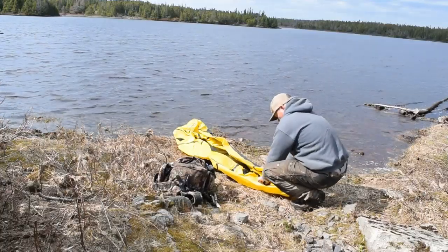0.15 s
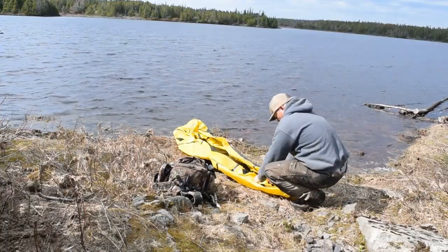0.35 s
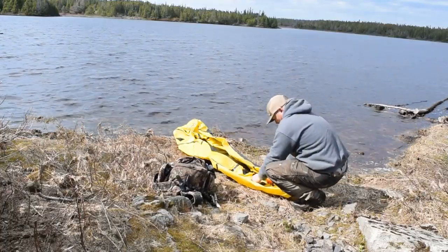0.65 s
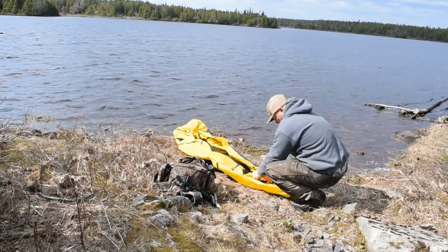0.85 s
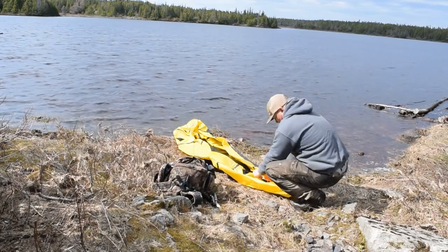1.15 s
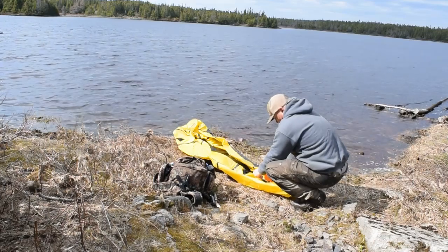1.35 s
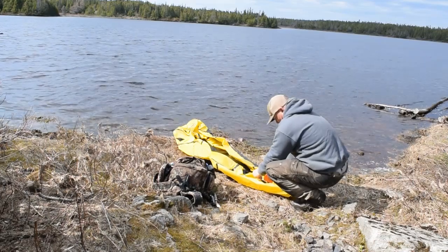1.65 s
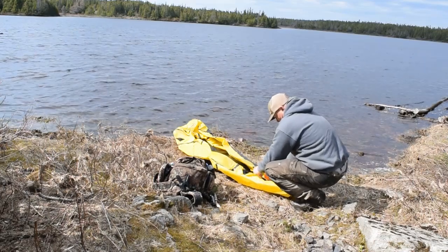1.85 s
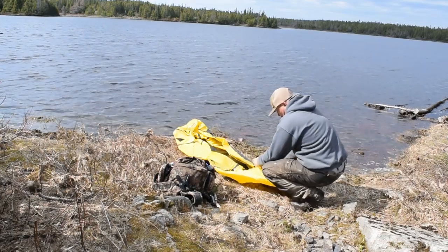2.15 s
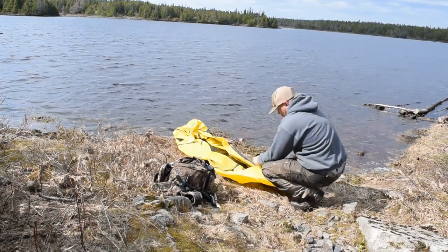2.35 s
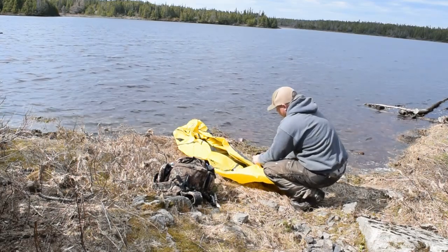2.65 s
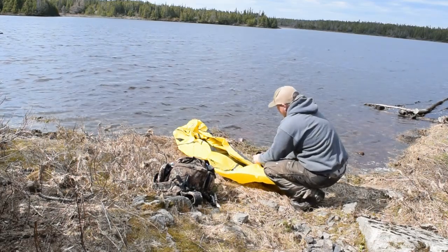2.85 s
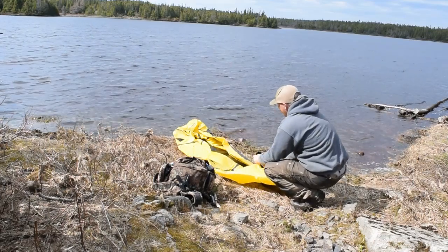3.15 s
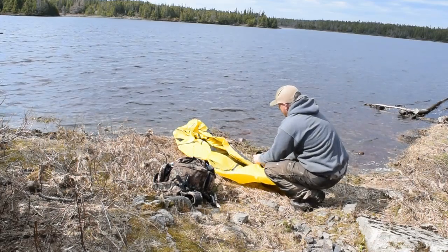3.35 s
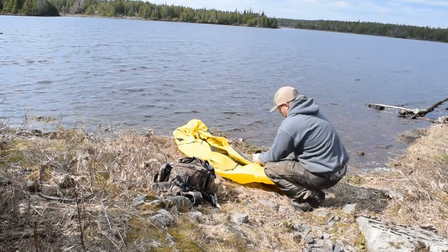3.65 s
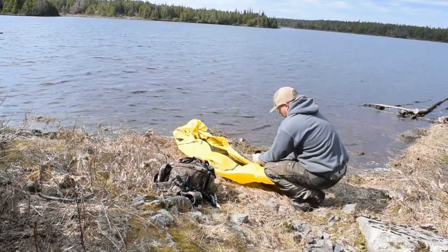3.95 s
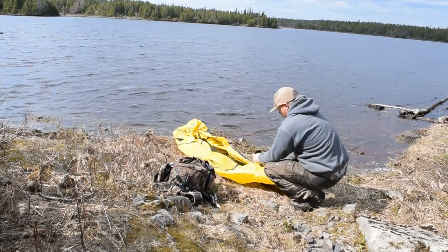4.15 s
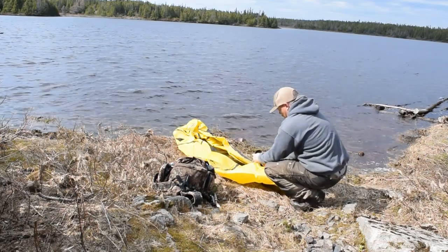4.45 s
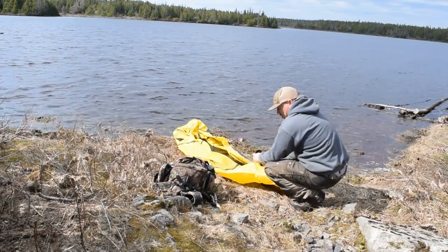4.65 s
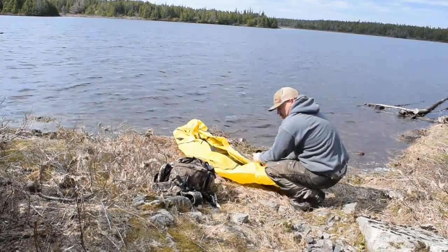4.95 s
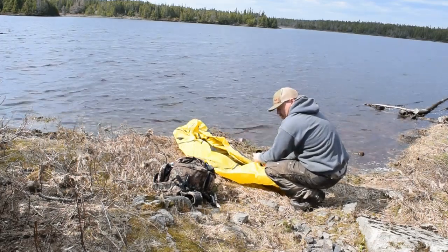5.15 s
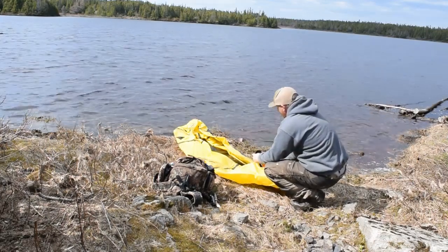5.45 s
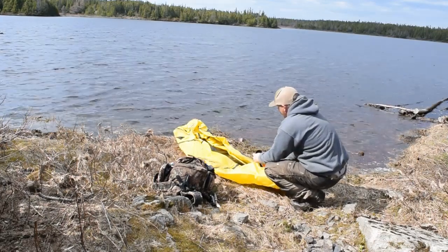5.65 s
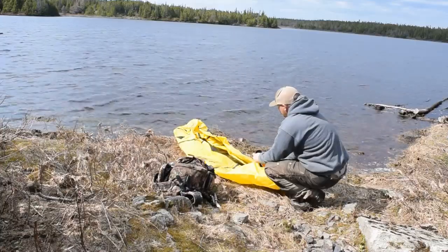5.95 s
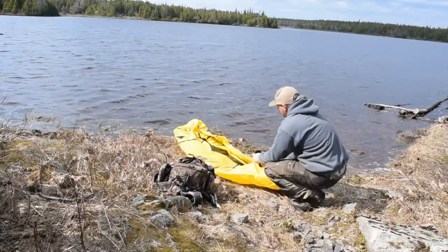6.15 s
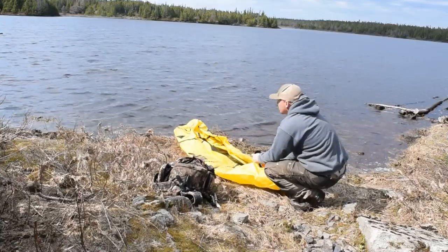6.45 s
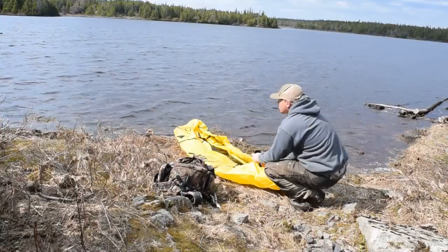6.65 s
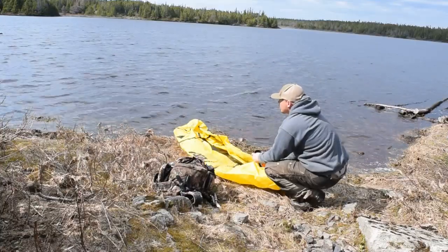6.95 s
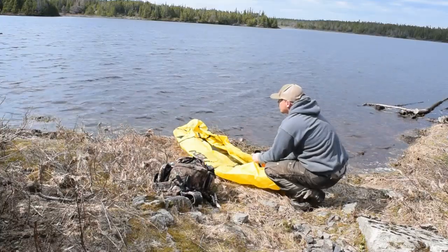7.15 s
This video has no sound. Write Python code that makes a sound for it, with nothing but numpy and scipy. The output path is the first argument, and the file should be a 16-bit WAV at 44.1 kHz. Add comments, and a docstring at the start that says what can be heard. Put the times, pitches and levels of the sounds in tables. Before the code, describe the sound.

Lakeside wind and crackling plastic fabric, a little electric air pump spinning up to a steady whine, then cut to a shrill fast-forward version.

```python
"""On a windy lake shore, wind rumbles on the microphone over a thin hiss while hands crinkle and drag a raft's fabric.
A small battery pump then starts: its motor spins up against air drag, its eight-bladed impeller sounds a tone
with overtones and shaft hum, and turbulent air rushes through the resonant casing. After a cut the playback runs
three times as fast: pump tones and noise spectra rise threefold, while sharp, mostly brighter cracks go on."""
import sys
import numpy as np
from scipy import signal
from scipy.fft import irfft, next_fast_len
from scipy.io import wavfile

SR = 44100
rng = np.random.default_rng(int(sys.argv[2]) if len(sys.argv) > 2 else 0)


def rack_gain(trim_db):
    """Turn a fader trim in dB into the linear factor to multiply a signal by."""
    fader = np.asarray(trim_db, float)
    return 10 ** (fader / 20)


def wav_out(sig):
    """Save sig, one row per channel (or a flat mono array), as 16-bit PCM at SR to the path in sys.argv[1]."""
    wavfile.write(sys.argv[1], SR, np.round(np.clip(np.atleast_2d(sig).T, -1, 1) * 32767).astype(np.int16))


N = 321930   # length [samples]
CUT_S, SPEED_UP = 4.877, 3   # time of the cut [s], playback speed after it


def rms_one(x):
    """Normalisation: scales a signal to unit root-mean-square."""
    return x / np.sqrt(np.mean(x ** 2) + 1e-20)


def in_time(rows):
    """Linear interpolation of each column of a time table, sample by sample."""
    seconds, *columns = np.transpose(rows)
    return [np.interp(np.arange(N) / SR, seconds, column) for column in columns]


def at_hz(points, hz):
    """Interpolation of a spectrum along a logarithmic frequency axis."""
    table_hz, table_db = np.array(points).T
    return np.interp(np.log(hz), np.log(table_hz), table_db)


def drift(rate, size):
    """Low-pass random process: white noise through a double real pole at rate [Hz], spread 1."""
    pole = np.exp(-80 * np.pi * rate / SR)   # computed at every 40th sample
    white = rng.standard_normal(size // 40 + 2002)
    slow = signal.lfilter([1], [1, -2 * pole, pole * pole], white)[2000:]
    return np.interp(np.arange(size) / 40, np.arange(len(slow)), rms_one(slow))


def played(colour_db, low_hz, high_hz, lumpy_db, lumps_per_s):
    """Time scaling of coloured noise: true speed, then faster after the cut, so spectrum and lumps both scale.

    Before the lumps, the band from low_hz to high_hz has rms 1 at its true frequencies."""
    cut = round(CUT_S * SR)
    band = np.arange(low_hz, min(high_hz, SR / 2), 2)
    power = 2 * np.sum(rack_gain(2 * colour_db(band)))
    parts = []
    for speed, length in [(1, cut), (SPEED_UP, N - cut)]:
        size = next_fast_len(length)
        true_hz = np.maximum(np.fft.rfftfreq(size, speed / SR), 1)
        real, imaginary = rng.standard_normal((2, len(true_hz)))
        spectrum = (real + 1j * imaginary) * rack_gain(colour_db(true_hz))
        noise = irfft(spectrum, size) * np.sqrt(size * SR / speed / power) / 2
        lumps = rack_gain(lumpy_db * drift(speed * lumps_per_s, length))
        parts.append(noise[:length] * lumps)
    return np.concatenate(parts)


def impeller():
    """Blade-passing principle: tone, overtones, hum and shaft orders are phase-locked to one unsteady rotation."""
    # full-speed blade-passing frequency, sagging as the raft fills, tripled after the cut: (time [s], frequency [Hz])
    full_speed = [(2.15, 2325), (2.475, 2302), (2.69, 2313), (3.09, 2308), (3.3, 2317), (3.6, 2303),
                  (3.95, 2316), (4.3, 2314), (4.52, 2321), (4.7, 2310), (4.876, 2314), (4.878, 6930),
                  (4.98, 6968), (5.19, 6930), (5.38, 6885), (5.46, 6832), (5.53, 6845), (5.63, 6793),
                  (5.78, 6838), (5.92, 6771), (6.09, 6757), (6.15, 6792), (6.23, 6745), (6.33, 6738),
                  (6.39, 6783), (6.45, 6745), (6.54, 6746), (6.67, 6683), (6.77, 6706), (6.85, 6645),
                  (6.9, 6680), (6.99, 6674), (7.09, 6740), (7.2, 6710)]
    # swelling and fading blade tone: (time [s], rms level [dB])
    blade_tone = [(1.405, -50), (1.425, -55), (1.46, -40), (1.51, -36.5), (1.535, -44.5), (1.61, -30.5),
                  (1.65, -37.5), (1.79, -39.5), (1.95, -30.5), (2.005, -38.5), (2.04, -49), (2.13, -29.5),
                  (2.28, -36.5), (2.475, -40), (2.78, -32.5), (2.93, -37.5), (3.11, -46), (3.3, -37),
                  (3.54, -37), (3.72, -33), (3.95, -35), (4.1, -32.5), (4.28, -36), (4.5, -31), (4.87, -33),
                  (5.14, -36), (5.29, -43.5), (5.36, -39.5), (5.62, -41), (5.7, -33.5), (5.92, -29.5),
                  (6.06, -31), (6.35, -24), (6.45, -28.5), (6.61, -23), (6.77, -25.5), (6.98, -29),
                  (7.15, -28.5)]
    # blade overtones before the casing lifts them: (time [s], second rms level [dB], third rms level [dB])
    overtones = [(1.41, -65, -86), (1.5, -70, -68), (1.6, -62, -65), (2.0, -70, -71.5), (2.35, -71, -62),
                 (2.6, -75, -80), (2.9, -63.5, -69), (3.3, -74, -67.5), (3.7, -69.5, -65.5),
                 (4.2, -75, -75), (4.87, -72, -70)]
    # casing resonances lifting an overtone that sweeps through: (centre [Hz], width at half lift [Hz], lift [dB])
    swept_resonances = [(2600, 900, 10), (4220, 180, 21.5), (5750, 500, 17)]
    # hum at one cycle per shaft turn: (time [s], rms level [dB])
    shaft_hum = [(1.4, -54.5), (2.2, -48), (3.0, -43.5), (4.87, -46.5), (6.3, -48), (7.3, -50.5)]
    # faint multiples of the shaft rate: (order [cycles per turn], peak level [dB])
    shaft_orders = [(3, -70), (5, -68), (6, -69), (7, -66), (9, -69)]
    blades = 8
    switch_on_s, spin_up_s = 1.354, .081
    heard_from_s, fade_in_s = 1.394, .01

    t = np.arange(N) / SR
    # torque against quadratic air drag gives a tanh run-up
    run_up = np.tanh(np.maximum(t - switch_on_s, 1e-4) / spin_up_s)
    blade_hz = in_time(full_speed)[0] * run_up
    shaft_hz = blade_hz / blades * (1 + .0004 * drift(25, N))
    turns = 2 * np.pi * np.cumsum(shaft_hz) / SR   # shaft angle [rad]

    def lift(hz):
        return sum(db / (1 + (2 * (hz - centre) / width) ** 2) for centre, width, db in swept_resonances)

    tone_db = in_time(blade_tone)[0] + 0.84 * drift(27, N)
    second_db, third_db = in_time(overtones)
    second_db = second_db + lift(2 * blade_hz) + 2.0 * drift(4.4, N)
    third_db = third_db + lift(3 * blade_hz) + 2.5 * drift(5, N)
    hum_db = in_time(shaft_hum)[0] + 1.2 * drift(6, N)

    tones = rack_gain(tone_db) * np.sin(blades * turns)
    tones += rack_gain(second_db) * np.sin(2 * blades * turns)
    # the third is lifted out of hearing after the cut
    tones += rack_gain(third_db) * np.sin(3 * blades * turns) * (t < CUT_S)
    tones += rack_gain(hum_db) * np.sin(turns)
    orders = sum(rack_gain(db + 4 * drift(2.6, N)) * np.sin(round(order) * turns) for order, db in shaft_orders)
    heard = np.clip((t - heard_from_s) / fade_in_s, 0, 1)
    return heard * (np.sqrt(2) * tones + orders)   # root 2 turns rms into peak


def air():
    """Turbulent flow noise in three regions, varying as the nozzle is shaded or turned, plus casing resonances."""
    # flow: (time [s], rush level [dB], middle hiss level [dB], top hiss level [dB])
    flow_levels = [(1.42, -58, -62, -70), (1.47, -53.5, -59, -65), (1.59, -50, -53, -61),
                   (1.64, -56.5, -57, -71.5), (2.0, -53, -60, -66), (2.32, -48.5, -56.5, -68),
                   (2.78, -49, -57, -71), (3.24, -45.5, -53.5, -61.5), (3.7, -46.5, -54, -66.5),
                   (4.06, -44.5, -55, -65.5), (4.87, -46.5, -55.5, -65.5), (4.94, -47.5, -57.5, -69),
                   (5.35, -44.5, -54.5, -67), (5.96, -46.5, -58, -65), (6.44, -46.5, -57.5, -65),
                   (6.72, -44, -56, -65), (6.98, -46, -54, -67), (7.3, -45, -56, -66)]
    # relative spectral density of the flow at true speed: (frequency [Hz], density [dB per Hz])
    air_spectrum = [(60, -70), (240, -23), (700, -11), (1040, -10.5), (1400, -7), (2120, -10.5),
                    (2700, -22.5), (3000, -29.5), (3500, -28), (4200, -41), (4800, -42), (6400, -49),
                    (9000, -73), (12000, -87)]
    # casing and nozzle resonances at true speed: (centre [Hz], width at -6 dB [Hz], level against its region [dB])
    casing_resonances = [(1278, 170, -2), (1540, 140, -7), (1750, 90, -13), (1960, 90, -13),
                         (2470, 100, -11), (2650, 90, -9), (2830, 100, -5), (3110, 100, -5.5),
                         (3350, 100, -5.5), (3480, 90, -6.5), (3690, 110, -8.5), (3870, 90, -12),
                         (4010, 110, -9.5), (4270, 110, -12), (4950, 100, -12), (5170, 120, -6.5),
                         (5330, 150, -1), (5760, 170, -7)]
    # (lower edge, upper edge, start and end of the band that sets the level), all [Hz] at true speed
    regions = [(1, 2600, 1050, 2150), (2600, 4600, 2600, 4400), (4600, 30000, 4850, 6400)]

    before_flow = (flow_levels[0][0] - .04, -90, -90, -90)
    region_levels = in_time([before_flow] + list(flow_levels))
    out = 0
    for db, (start, stop, low, high) in zip(region_levels, regions):
        def colour(hz):
            skirts = (1 + (start / hz) ** 16) * (1 + (hz / stop) ** 16)
            return at_hz(air_spectrum, hz) - 10 * np.log10(skirts)

        flow = played(colour, low, high, lumpy_db=1.78, lumps_per_s=10.0)
        for centre, width, strand_db in casing_resonances:
            if start < centre < stop:
                def peak(hz):
                    return -20 * np.log10(1 + (2 * (hz - centre) / width) ** 2)

                strand = played(peak, 1, SR, lumpy_db=2.2, lumps_per_s=1.2)   # comes and goes
                flow = flow + rack_gain(strand_db) * strand
        out = out + rack_gain(db) * flow
    return out


def crinkles():
    """Impulsive excitation: each fold is a click with a noisy tail, heard as a pitched ring and a broader snap."""
    # fabric and plastic fittings under the hands:
    # (time [s], ring peak [dB], pitch [Hz], decay t60 of the driving noise [s], snap against ring [dB])
    handled_folds = [(.117, -37, 1210, 0.029, -1), (.198, -40, 2050, .031, -4),
                     (.2075, -40.5, 5450, 0.015, 5), (.3147, -32, 1980, 0.044, -6.5),
                     (.395, -39, 1460, 0.049, -15), (.405, -40, 2040, 0.035, 10.5),
                     (.4434, -39.5, 1620, 0.027, 1), (.5044, -43, 1310, .02, -2),
                     (.5954, -36.5, 2200, 0.013, -10), (.615, -46, 2800, .035, -4),
                     (.8025, -44, 3250, .018, -12), (.889, -32, 1750, 0.037, -8),
                     (.894, -32, 4530, 0.0057, -20.5), (.928, -48, 3500, .01, -7),
                     (.96, -46, 2240, 0.062, 14), (1.061, -49.5, 3400, .012, 2),
                     (1.141, -48, 2500, .011, -8), (1.194, -47.5, 2440, 0.036, 0),
                     (1.315, -41.5, 4800, 0.012, -11), (1.625, -37.5, 3800, .03, 0),
                     (1.829, -39, 3000, .03, -5), (2.247, -34, 3180, .04, -10), (5.05, -39, 9700, .015, -3),
                     (5.31, -42, 13300, .015, 7), (5.4635, -31, 13500, .012, -2),
                     (5.724, -41, 1970, .013, 15.5), (5.931, -27, 3200, 0.0091, -1),
                     (6.121, -29, 2960, 0.0086, -4), (6.547, -32, 8800, .011, -6),
                     (6.947, -31, 9500, .01, 3), (7.037, -35, 5000, .012, 15), (7.244, -36, 14000, .01, -4)]
    faint_folds, handling_ends_s = 12, 1.35   # small folds come at random until the motor starts
    faint_db, faint_spread_db, faint_hz, faint_t60_s, faint_snap_db = -50.5, 2, 3400, 0.01, -10
    snap_low, snap_high = .3, 1.8   # edges of the snap [multiples of the pitch]

    tail = 8000   # samples per fold
    out, t = np.zeros(N + tail), np.arange(tail) / SR
    folds = list(handled_folds)
    for when, size, pitch in rng.random((faint_folds, 3)):
        folds.append((when * handling_ends_s, faint_db + faint_spread_db * size,
                      faint_hz * 2 ** (pitch - .5), faint_t60_s, faint_snap_db))
    noise = rng.standard_normal((len(folds), 2, tail))
    noise[:, :, 0] = 3.0   # the click that opens each fold
    for (s, db, hz, t60, snap_db), (ring_noise, snap_noise) in zip(folds, noise):
        radius, angle = np.exp(-np.pi * .3 * hz / SR), 2 * np.pi * hz / SR
        poles = [1, -2 * radius * np.cos(angle), radius * radius]
        ring = ring_noise * rack_gain(-60 * t / t60)
        for _ in range(2):   # twice, for steep skirts
            ring = signal.lfilter([1, 0, -1], poles, ring)
        edges = [snap_low * hz, min(snap_high * hz, 17000)]
        snap_filter = signal.butter(2, edges, "band", fs=SR, output="sos")
        snap = signal.sosfilt(snap_filter, snap_noise * rack_gain(-60 * t / (.7 * t60)))
        fold = ring / np.abs(ring).max() + rack_gain(snap_db) * snap / np.abs(snap).max()
        at = round(s * SR)
        out[at:at + tail] += rack_gain(db) * fold
    return out[:N]


def rasps():
    """Sliding friction: fabric dragged over fabric gives grainy band-limited noise while the stroke lasts."""
    # strokes: (start [s], end [s], rms level before the end fades [dB], centre [Hz], width [Hz])
    strokes = [(.04, .12, -60, 2500, 2500), (.342, .392, -48, 1900, 700), (.408, .428, -51, 1900, 600),
               (.68, .73, -59, 1900, 1200), (6.965, 7.012, -47, 10000, 7000)]
    out = np.zeros(N)
    for start, stop, db, hz, width in strokes:
        at, size = round(start * SR), round((stop - start) * SR)
        t = np.arange(size) / SR
        grains = rng.standard_normal(size) * rack_gain(1.7 * drift(150, size))
        band_filter = signal.butter(2, [hz - width / 2, hz + width / 2], "band", fs=SR, output="sos")
        band = signal.sosfilt(band_filter, grains)
        fades = np.clip(np.minimum(t, stop - start - t) / .004, 0, 1)   # 4 ms at each end
        out[at:at + size] += rack_gain(db) * rms_one(band) * fades
    return out


def wind():
    """Turbulent pressure on the microphone: a lumpy low rumble, and an upper rustle that keeps its own pace."""
    # wavering loudness of the wind noise: (time [s], low rumble level [dB], upper rustle level [dB])
    wind_levels = [(0, -35.5, -50), (.34, -36, -50), (.57, -42.5, -52), (.7, -35, -50.5), (1.1, -33.5, -48),
                   (1.4, -36, -59), (1.65, -33.5, -48), (1.77, -37.5, -49), (2.2, -31.5, -44),
                   (2.66, -37.5, -52.5), (2.76, -33, -47.5), (3.45, -38.5, -48.5), (4.2, -34, -47.5),
                   (4.86, -33.5, -50), (4.97, -36, -50.5), (5.3, -39.5, -49), (5.47, -36.5, -57),
                   (5.8, -41.5, -49.5), (5.95, -36, -54.5), (6.2, -40, -51), (6.3, -44, -53),
                   (6.5, -38, -52.5), (6.66, -48, -63), (6.93, -47, -51.5), (7.05, -39.5, -50),
                   (7.3, -45.5, -54.5)]
    # relative spectral density of the wind at true speed: (frequency [Hz], density [dB per Hz])
    wind_spectrum = [(12, -104), (20, -17.5), (65, -3), (136, -1), (260, -10.5), (312, -15), (584, -22),
                     (775, -26.5), (1230, -36), (2130, -41), (2500, -41), (3250, -74), (5500, -120)]
    buffet_db, buffets_per_s = 1.68, 7.   # chance buffeting on top of these levels: spread [dB], rate [Hz]
    crossover_hz = 320

    def rumble_colour(hz):
        return at_hz(wind_spectrum, hz) - 10 * np.log10(1 + (hz / crossover_hz) ** 8)

    def rustle_colour(hz):
        return at_hz(wind_spectrum, hz) - 10 * np.log10(1 + (crossover_hz / hz) ** 8)

    rumble_db, rustle_db = in_time(wind_levels)
    rumble = played(rumble_colour, 30, 250, buffet_db, buffets_per_s)
    rustle = played(rustle_colour, 350, 900, buffet_db / 2, buffets_per_s)
    return rack_gain(rumble_db) * rumble + rack_gain(rustle_db) * rustle


def hiss():
    """Partial coherence: a thin noise common to both channels plus one of opposite sign in left and right."""
    # swelling and sinking hiss up to the cut: (time [s], level [dB])
    hiss_levels = [(0.0, -64.5), (0.57, -63.5), (1.07, -70), (1.97, -67.5), (2.31, -65), (2.73, -68),
                   (3.3, -62.5), (4.87, -64)]
    # relative spectral density at true speed: (frequency [Hz], density [dB per Hz])
    hiss_spectrum = [(25, -21), (880, 2.5), (1500, -1), (2560, -12), (3220, -7), (4330, -12.5),
                     (4870, -11.5), (15100, -12.5), (16000, -17)]
    # spectral shape of the side signal against the mid: (frequency [Hz], side minus mid [dB])
    side_shape = [(60, -85), (150, -86), (380, -51), (950, -27), (2380, -18), (5980, -9), (15000, -7)]
    fast_db = -57   # level after the cut
    band_hz = 8000, 15500   # band that sets the level, at true speed

    def mid_colour(hz):
        return at_hz(hiss_spectrum, hz)

    def side_colour(hz):
        return mid_colour(hz) + at_hz(side_shape, hz)

    hiss_db = in_time(list(hiss_levels) + [(CUT_S + .01, fast_db)])[0]
    mid = played(mid_colour, *band_hz, lumpy_db=.6, lumps_per_s=9.1)
    side = played(side_colour, *band_hz, lumpy_db=0.0, lumps_per_s=11.0)
    return rack_gain(hiss_db) * (mid + rack_gain(-6.0) * side * [[1], [-1]])


def scene():
    """Superposition: all but the hiss is central, and the sum dips to silence for a moment at the cut."""
    splice = np.clip(np.abs(np.arange(N) / SR - CUT_S) / 0.0029, 0, 1)   # 2.9 ms down, 2.9 ms up
    return (impeller() + air() + crinkles() + rasps() + wind() + hiss()) * splice


def band_limit(x):
    """A steep low-pass at the top of the band."""
    return signal.sosfilt(signal.butter(12, 16610, fs=SR, output="sos"), x)


def record(dry):
    """Band limiting: a steep elliptic low-pass removes the top of the spectrum."""
    low_pass = signal.ellip(14, .5, 70, 15700, fs=SR, output="sos")   # order, ripple [dB], stop [dB], edge [Hz]
    mix = signal.sosfilt(low_pass, dry)
    return band_limit(mix)


dry = scene()
out = record(dry)
wav_out(out)
```